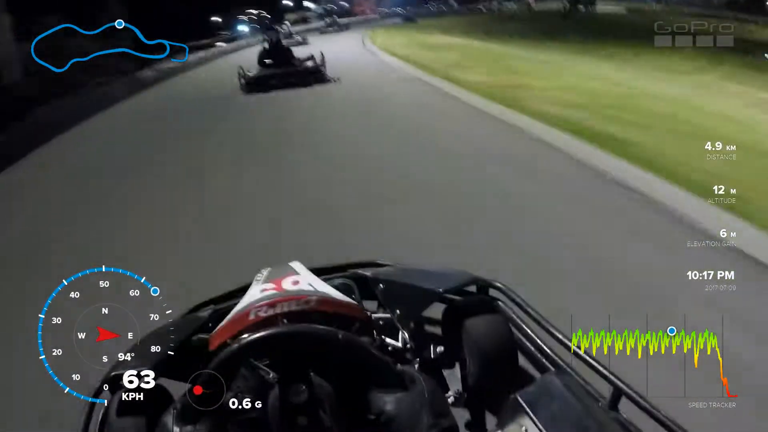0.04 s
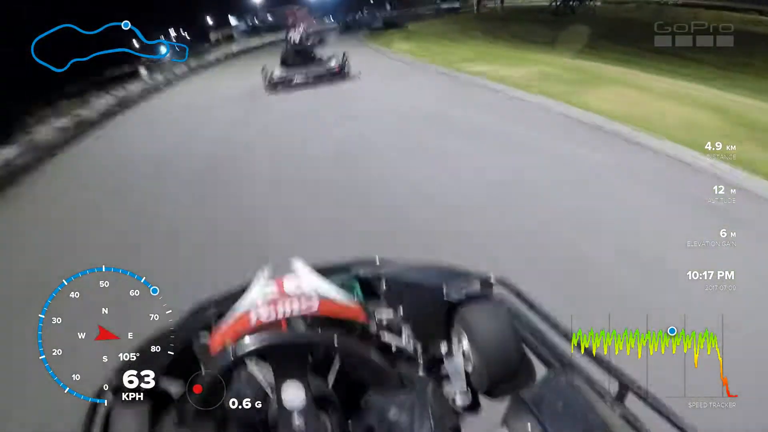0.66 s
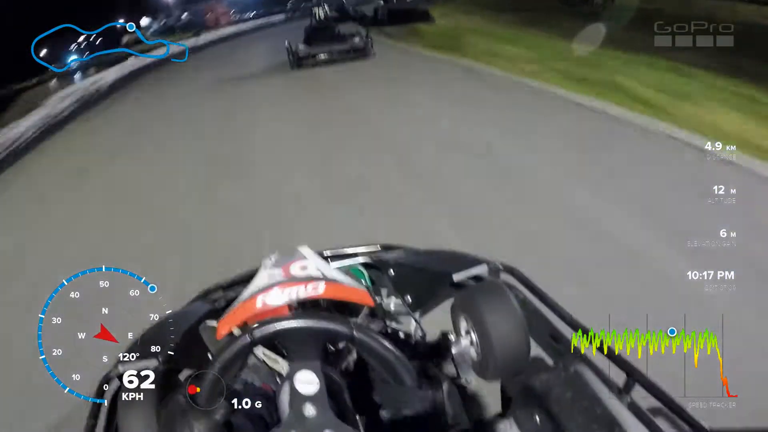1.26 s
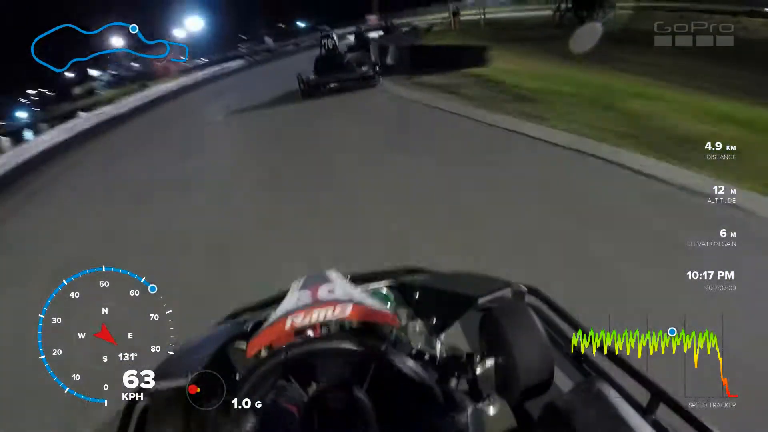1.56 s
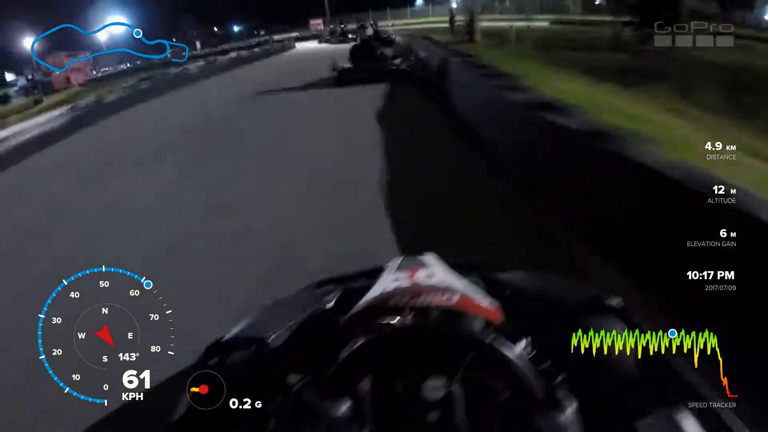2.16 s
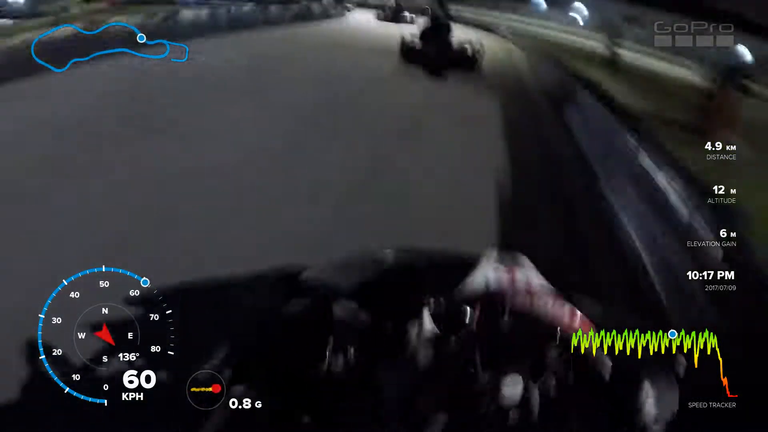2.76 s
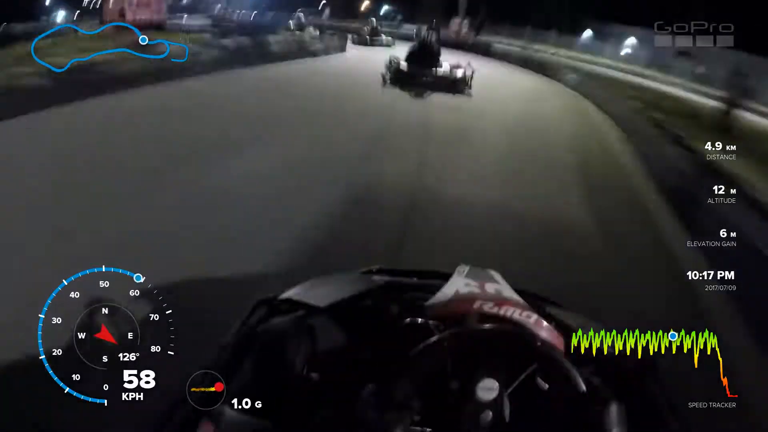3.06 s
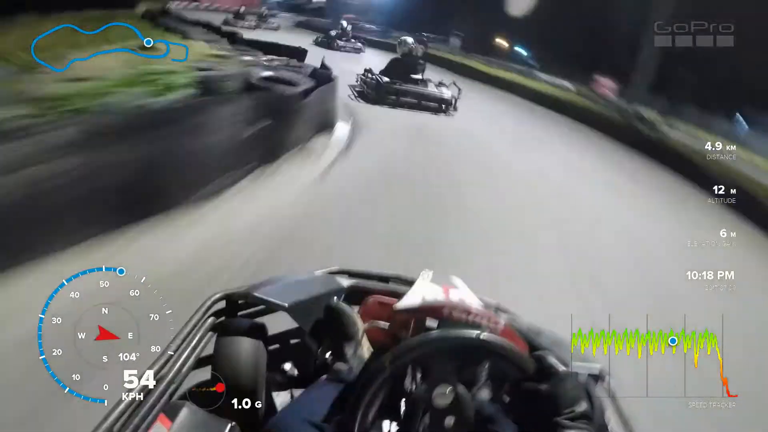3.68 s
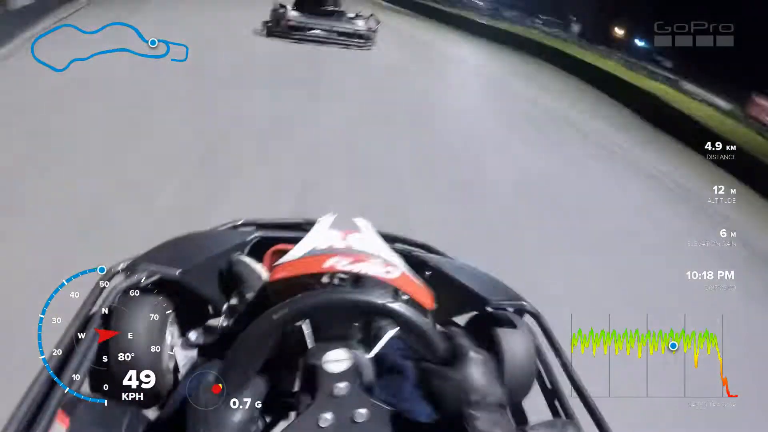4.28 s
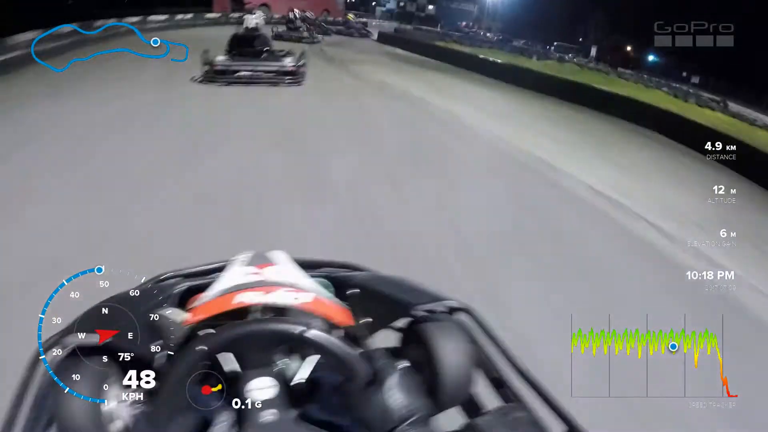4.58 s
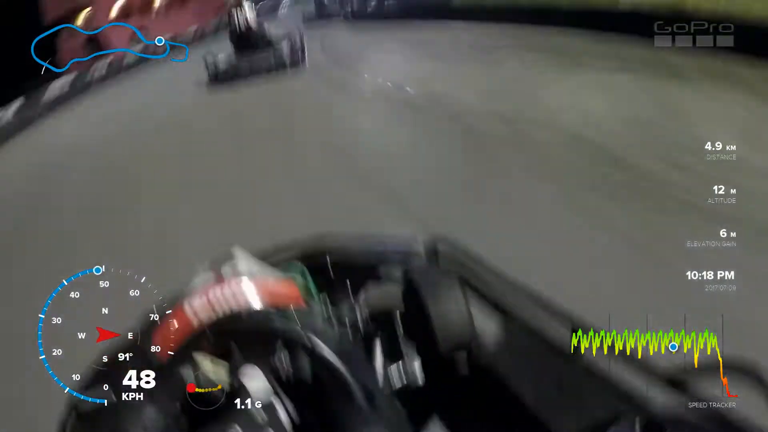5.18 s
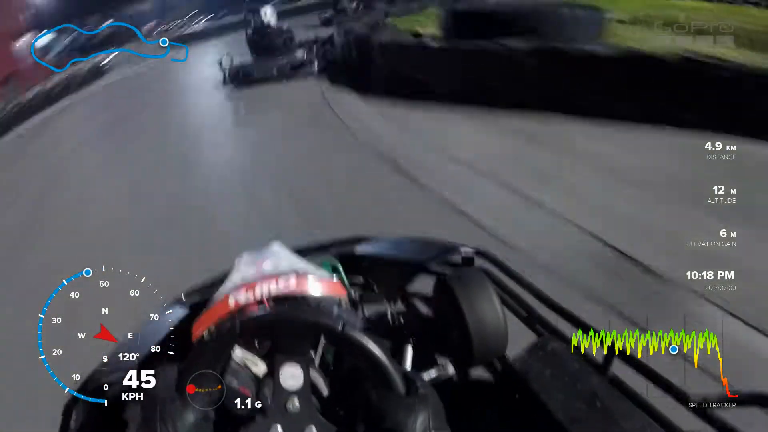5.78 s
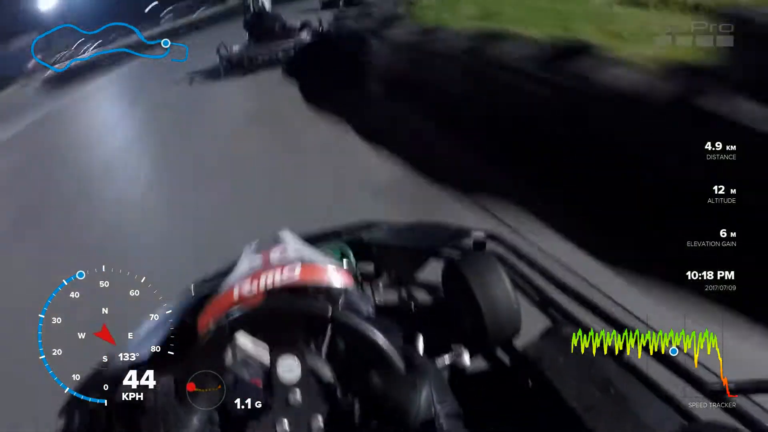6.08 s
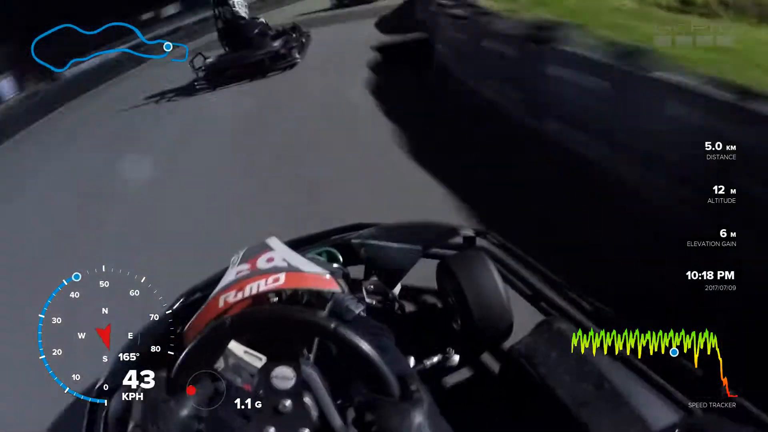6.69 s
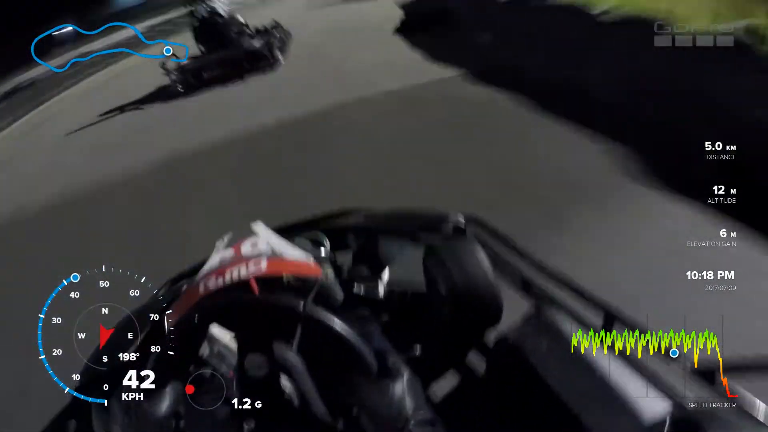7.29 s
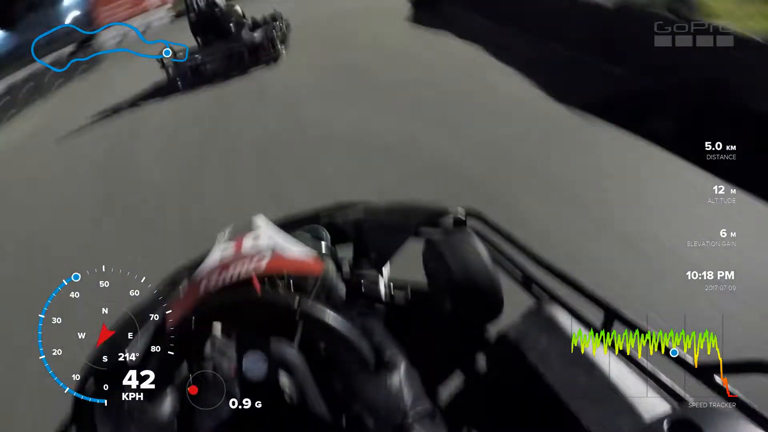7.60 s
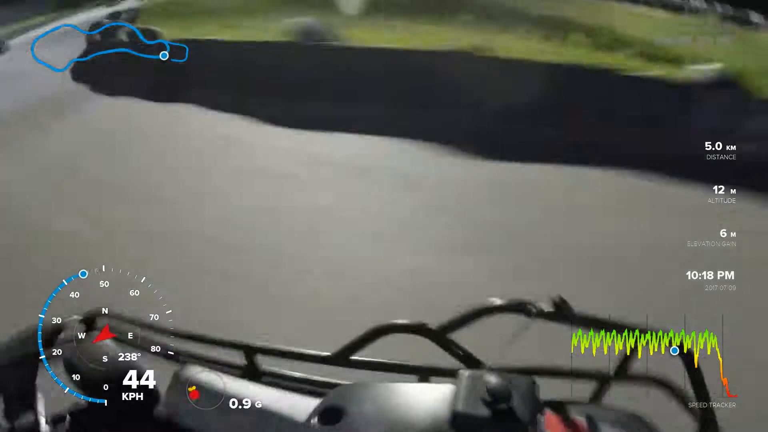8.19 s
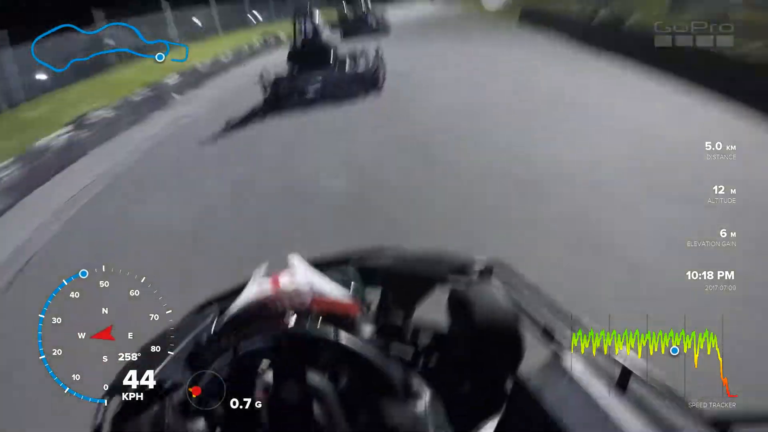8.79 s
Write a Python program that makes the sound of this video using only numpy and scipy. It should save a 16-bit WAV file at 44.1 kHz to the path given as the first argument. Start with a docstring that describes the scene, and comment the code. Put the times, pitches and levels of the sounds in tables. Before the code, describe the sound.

Wind rushes over a helmet microphone as a small four-stroke kart engine buzzes close by at racing speed. The frame clatters over bumps, and the tyres judder and give short squeaks on the asphalt. After a brief rub of the brake, the engine note keeps falling while chain and valves rasp. At the end the throttle opens fully and the pitch lifts slightly under a strong gust.

```python
"""The drone of a single-cylinder four-stroke kart at racing speed, heard from the driver's helmet.
Its pitch sinks through a run of corners, then the engine pulls again under load. Exhaust pulses make a
harmonic series, the piston shakes the frame, and chain and valves add impact noise. Tyres roar, judder
and chirp on the asphalt, the frame rattles on bumps and the brake rubs briefly, while the turbulent
airstream buffets the microphone."""
import sys
import numpy as np
from scipy import signal
from scipy.fft import rfft, irfft, next_fast_len
from scipy.io import wavfile
from scipy.ndimage import uniform_filter1d, minimum_filter1d

SR = 44100
rng = np.random.default_rng(int(sys.argv[2]) if len(sys.argv) > 2 else 0)


def dump_mix(stems):
    """Bounce the given channels to the path in sys.argv[1] as a 16-bit WAV at rate SR."""
    frames = np.atleast_2d(stems).T  # one column per channel
    limited = np.clip(frames, -1, 1)  # hard clip at full scale
    pcm = np.round(limited * 32767).astype(np.int16)
    wavfile.write(sys.argv[1], SR, pcm)


N = 390285

# how the engine is driven: time_s, state (0 flat out, 1 eased, 2 pulling from low revs, 3 floored)
THROTTLE = [(0, 0), (2.35, 0), (2.8, 1), (4.05, 1), (4.35, 2), (5.12, 2), (5.2, 1), (5.28, 1), (5.36, 2),
            (8.15, 2), (8.35, 3), (8.85, 3)]


def engine(crank_hz):
    """Phase locking: exhaust, shake, chain and valves all follow one cycle of two crank turns."""
    firing_hz = crank_hz / 2
    cycle = np.cumsum(firing_hz) / SR + .22   # whole numbers fall on the exhaust beats
    return exhaust(cycle, firing_hz) + crank_shake(cycle, crank_hz) + chain(cycle) + valves(cycle, firing_hz)


def exhaust(cycle, firing_hz):
    """Periodic pressure pulses form a harmonic series; a puff of turbulent gas leads each pulse."""
    # exhaust harmonics: firing_multiple, flat_out_db, eased_db, pulling_db, floored_db
    harmonics = [(1, -14, -19, -21, -21), (3, -5, -7, -7, -6), (4, -16, -2, -11.5, -12),
                 (5, -2, -8, -3.5, -7.5), (6, 0, -8, -4.5, -5.5), (7, -7.5, -17, -5.5, -6),
                 (8, -12, -19, -7.5, -9), (9, -15, -20, -10, -11), (10, -14, -19, -18, -21),
                 (11, -12.5, -20, -18, -15), (12, -17, -23, -23, -24), (13, -18, -29, -22, -19),
                 (14, -19, -28, -24, -24), (15, -21, -29, -22, -23), (16, -17, -28, -25, -22)]
    # the silencer booms or cancels as a harmonic sweeps through: centre_hz, width_hz, gain_db
    silencer = [(97, 14, -6), (158, 16, 3), (207, 18, 2), (230, 10, 2.5), (254, 14, -5), (288, 22, 5.5),
                (423, 25, 3)]
    # overall exhaust gain: flat_out_db, eased_db, pulling_db, floored_db
    throttle_db = [-33, -27, -26, -21.5]
    throttle, = in_time(THROTTLE)
    states = np.arange(len(throttle_db))
    pulses = np.zeros(N)
    for order, *levels_db in harmonics:
        level_db = np.interp(throttle, states, levels_db) + .8 * drift(1.8)
        level_db += resonance_db(silencer, order * firing_hz)
        lag_rad = .07 * (order - 5.5) ** 2   # dispersion: the pipe spreads each pulse in time
        pulses -= np.sqrt(2) * from_db(level_db) * np.cos(2 * np.pi * order * cycle - lag_rad)
    # turbulent gas: frequency_hz, level_db
    puff_spectrum = [(110, -2.5), (165, -1.5), (250, -0.5), (350, -13.5), (450, -18), (900, -17.5),
                     (2000, -36.5)]
    valve_open = np.exp((np.cos(2 * np.pi * (cycle + .12)) - 1) / .7)
    puff = from_db(-8.5) * noise(puff_spectrum, valve_open)
    gain = from_db(np.interp(throttle, states, throttle_db))
    return gain * (pulses + puff) * per_cycle(cycle, spread_db=.9)


def crank_shake(cycle, crank_hz):
    """Forced vibration: the unbalanced piston shakes the frame once a turn, hardest at resonance."""
    # resonances of the frame: centre_hz, width_hz, gain_db
    frame_modes = [(56.4, 1.9, 8), (76.4, 1.9, 5)]
    shake = rms_one(-np.cos(4 * np.pi * cycle) * from_db(2.5 * drift(5)))
    return from_db(-31 + resonance_db(frame_modes, crank_hz)) * shake


def chain(cycle):
    """Dense impacts of chain and gears merge into noise, amplitude-modulated by each crank turn."""
    # chain and gear clatter: frequency_hz, level_db
    clatter_spectrum = [(300, -11), (800, -10), (1200, 8.5), (1800, 9), (2400, -1.5), (3150, -1.5),
                        (3750, 6.5), (4900, 0.5), (6150, -4), (7000, -28.5), (8500, -23), (10500, -57)]
    clatter_db, _ = in_time(MECHANICAL_LEVELS)
    load = 1 + .11 * np.cos(4 * np.pi * (cycle - .25))
    grain = from_db(1.5 * drift(170))
    return from_db(clatter_db) * noise(clatter_spectrum, load * grain)


def valves(cycle, firing_hz, decay_s=.0072):
    """Impact excitation: each contact of cam, rocker and valve sets off a decaying metallic rasp."""
    # contacts after the exhaust beat: cycle_fraction, level_db
    contacts = [(.15, 6), (.3, -7), (.62, -3), (.82, 0), (.9, -4)]
    # valve tick: frequency_hz, level_db
    tick_spectrum = [(1500, -1), (2600, -2.5), (3900, 11), (5000, 6.5), (6100, 10.5), (7100, -1.5),
                     (8000, -5.5), (9400, -14), (10400, -33)]
    _, tick_db = in_time(MECHANICAL_LEVELS)
    envelope = np.zeros(N)
    for place, db in contacts:
        age_s = (cycle - place) % 1 / firing_hz
        envelope += from_db(db) * np.exp(-age_s / decay_s) * per_cycle(cycle, spread_db=2)
    grain = from_db(.7 * np.clip(drift(350), -2, 2))
    return from_db(tick_db) * noise(tick_spectrum, envelope * grain)


def wind(speed_db, rough_db):
    """Turbulence: eddies at the microphone make a deep buffeting and a broader rush, rising with speed."""
    # gusts: start_s, end_s, gain_db
    gusts = [(3.3, 4.1, 2.5), (5.35, 6.8, 5.5), (8.25, 9.2, 10)]
    # sheltered stretches: start_s, end_s, gain_db
    lulls = [(2.2, 3.2, -1.5), (4.3, 5.1, -3), (5.1, 8.1, 0)]
    # buffeting and rush: frequency_hz, level_db
    buffet_spectrum = [(12, -14), (22, -4), (35, 0.5), (50, -2), (90, -5), (200, -14.5), (500, -47)]
    rush_spectrum = [(35, -12.5), (65, -6), (105, 0.3), (200, -2), (290, -6.5), (380, -13), (600, -31),
                     (1500, -39)]
    gust_db = stretches(gusts, edge_s=.29)
    lull_db = stretches(lulls, edge_s=.29)
    buffet_db = -29.5 + 3.6 * speed_db + gust_db + 2.5 * drift(2.2)
    rush_db = -22 + .71 * speed_db + .13 * gust_db + .34 * rough_db + lull_db
    buffet = evened(noise(buffet_spectrum), span_s=.089)
    rush = evened(noise(rush_spectrum), span_s=.23)
    return from_db(buffet_db) * buffet + from_db(rush_db) * rush


def tyres(roar_db, rough_db, judder_hz=15):
    """Amplitude modulation: the unsprung chassis hops on its tyres, so roar and scrub come in surges."""
    # sideways scrub, following the cornering load: time_s, level_db
    cornering = [(0, -37.5), (1.2, -49), (2.0, -30), (2.44, -35), (2.7, -32), (3.05, -35.5), (3.4, -39.5),
                 (4.2, -31.5), (4.75, -41.5), (5.35, -35), (6.5, -36), (7.6, -40.5), (8.15, -35.5),
                 (8.85, -35.5)]
    # rolling roar and sideways scrub: frequency_hz, level_db
    roar_spectrum = [(150, -11.5), (300, 3.5), (430, 5), (800, 1), (1150, -1.5), (1500, -7.5), (2050, -9.5),
                     (2700, -14), (4000, -23), (6000, -22), (7200, -48.5), (10000, -88.5)]
    scrub_spectrum = [(700, -10.5), (1050, -7.5), (1230, -2), (1450, 0.5), (1650, 0), (2000, -5),
                      (2500, -16), (3400, -11.5), (4500, -30.5), (7000, -70.5)]
    cornering_db, = in_time(cornering)
    hop = np.sin(2 * np.pi * np.cumsum(judder_hz * (1 + .29 * drift(6.02))) / SR)
    grip = .41 * hop + .44 * drift(35)
    asphalt = from_db(.75 * drift(150))
    roar = noise(roar_spectrum, asphalt * from_db(2 * grip))
    scrub = noise(scrub_spectrum, asphalt * from_db(grip))
    return from_db(roar_db) * roar + from_db(cornering_db + .29 * rough_db) * scrub


def tyre_chirps(edge_s=.013, pitch_jitter=.07):
    """Stick-slip friction: the tread gives short, unsteady squeals with a rasp around them."""
    # slips of the tread: start_s, level_db, pitch_hz, length_s
    slips = [(1.808, -29, 1480, 0.019), (1.914, -33, 1505, .055), (2.311, -26.5, 1410, 0.022),
             (2.492, -29.5, 1460, 0.08), (2.512, -30, 1750, 0.025), (2.58, -28.5, 1442, 0.075),
             (2.772, -32, 1500, 0.028), (2.906, -29, 1440, .024), (2.941, -34, 1430, 0.089),
             (3.072, -29, 1450, 0.039), (3.116, -29.5, 1420, 0.037), (3.266, -31, 1440, 0.046),
             (3.41, -30.5, 1510, 0.022), (3.944, -41, 1480, 0.06), (4.18, -33, 1440, 0.069),
             (4.42, -35, 1550, 0.043), (8.61, -29, 1480, 0.076)]
    # rasp of the slipping tread: frequency_hz, level_db
    rasp_spectrum = [(1100, -4.5), (1350, -0.5), (1470, -5), (1620, -8), (1900, -5.5), (2400, -21.5),
                     (3000, -15), (3600, -46)]
    t = np.arange(N) / SR
    warped_s = np.cumsum(1 + pitch_jitter * drift(111.1)) / SR
    flutter = evened(from_db(6.5 * drift(90)), span_s=.02)
    rasp = from_db(-3.5) * noise(rasp_spectrum)
    out = np.zeros(N)
    for start, db, hz, length in slips:
        at = slice(int((start - edge_s) * SR), int((start + length + edge_s) * SR))
        squeal = flutter[at] * np.sin(2 * np.pi * hz * warped_s[at])
        out[at] += from_db(db) * gate(t[at], start, start + length, edge_s) * (squeal + rasp[at])
    return out


def seam_thuds(mode_spread_db=2.5):
    """Impulse response: each seam strikes the damped chassis modes and leaves a rumble in the tyre."""
    # seams in the asphalt: start_s, level_db, decay_s
    seams = [(1.876, -29, .014), (1.977, -22, .018), (2.047, -15.5, 0.031), (2.238, -20.5, 0.015),
             (2.353, -24.5, 0.013), (2.607, -22.5, 0.0088), (2.908, -32, .007), (3.214, -23, .006),
             (3.461, -24.5, .008), (3.61, -24, 0.0068), (4.079, -23, .022), (4.128, -25, 0.0062),
             (4.252, -29, .01), (4.31, -20, .012), (4.368, -26, 0.011), (4.447, -33, 0.0058),
             (4.493, -25, 0.0058), (4.573, -27, .006), (5.072, -22.5, 0.012), (5.565, -20.5, 0.0031),
             (5.613, -20, .004), (5.645, -20, 0.0071), (8.668, -26, 0.0065), (8.721, -18, .02),
             (8.822, -29, .01)]
    # chassis modes: pitch_hz, level_db, t60_s
    modes = [(380, 1, .02), (554, 2, 0.011), (770, -4, 0.013), (1070, -12, 0.011)]
    # tyre rumble: frequency_hz, level_db
    rumble_spectrum = [(150, -7), (300, 0.5), (550, 8.5), (850, 5), (1150, -4), (1500, -7), (2700, -14),
                       (5500, -14.5), (7200, -54)]
    t = np.arange(SR // 10) / SR
    knocks = np.zeros(N + len(t))
    for start, db, _ in seams:
        at = int(start * SR)
        for hz, mode_db, t60 in modes:
            strike_db = db + mode_db + mode_spread_db * rng.standard_normal()
            knocks[at:at + len(t)] += from_db(strike_db - 60 * t / t60) * np.sin(2 * np.pi * hz * t)
    envelope = sum(bursts([(start, db)], rise_s=.0018, decay_s=decay) for start, db, decay in seams)
    rumble = envelope * evened(noise(rumble_spectrum), span_s=.018)
    return from_db(1.5) * knocks[:N] + from_db(-1.2) * rumble


def frame_rattle(speed, roar_db, top_jolts_per_s=7):
    """Contact noise: big bumps and a Poisson train of small jolts set the frame clattering."""
    # big bumps: start_s, level_db, length_s
    bumps = [(.002, -23, 0.022), (.024, -24.5, 0.034), (.109, -25.5, 0.023), (.152, -22, .03),
             (.324, -23, 0.015), (.356, -22.5, 0.013), (.407, -22, 0.0092), (.432, -27, .008),
             (.46, -22, 0.0084), (.561, -23, 0.019), (.613, -21, 0.015), (.94, -27, 0.0092),
             (1.092, -24, .012), (1.135, -27, 0.009), (1.151, -24, 0.0093), (1.243, -22, 0.011),
             (1.296, -22, 0.039), (1.345, -25, .012), (1.579, -21, 0.025), (1.689, -25, .01),
             (1.728, -22, 0.031), (1.806, -25, 0.022), (1.966, -22, .018), (1.991, -19, 0.019),
             (2.018, -25, 0.0073), (2.038, -19, .034), (2.08, -28, 0.048), (2.119, -26, 0.026),
             (2.168, -24, 0.0074), (2.235, -21, 0.027), (2.353, -30, .012), (2.404, -22.5, 0.01),
             (2.85, -25, 0.014), (2.993, -26, .009), (3.096, -24.5, .012), (3.189, -23, 0.011),
             (3.347, -32, 0.0097), (3.556, -25, 0.01), (3.654, -25.5, .012), (3.728, -30, .016),
             (3.845, -24, .012), (3.97, -28, 0.011), (4.074, -23, .013), (4.122, -24, .011),
             (4.137, -25, 0.009), (4.238, -22, 0.027), (4.556, -26, 0.015), (5.628, -27, 0.017),
             (8.61, -26, 0.019), (8.672, -34, .01), (8.705, -26, .045)]
    # rattling frame: frequency_hz, level_db
    rattle_spectrum = [(250, 7), (600, 6), (1300, 8), (2200, 1), (3600, -6.5), (4500, -11), (6200, -16.5),
                       (7200, -51), (10000, -68.5)]
    at = np.flatnonzero(rng.random(N) < top_jolts_per_s * speed / SR)
    jolt_db = roar_db - 8 + 3 * rng.uniform(-1.1, 1, N)
    envelope = bursts(zip(at / SR, jolt_db[at]), rise_s=.01, decay_s=.026)
    for start, db, length in bumps:
        first = int(start * SR)
        progress = np.linspace(0, 1, int(length * SR))
        arch = np.abs(np.sin(np.pi * progress ** .85)) ** .55   # builds up and stops short
        envelope[first:first + len(arch)] += from_db(db) * arch
    grain = from_db(drift(500))
    return envelope * evened(noise(rattle_spectrum, grain), span_s=.012)


def brake():
    """Friction excitation: the pad hisses, and the disc sings in snatches as the pad catches and lets go."""
    # the brake drags into the corner: time_s, rub_db, sing_db
    braking = [(0, -76, -70), (2.45, -56, -75.5), (2.68, -41.5, -45), (2.82, -43, -37), (3.05, -60, -40),
               (3.5, -50, -33), (3.8, -73, -47), (4.2, -74, -80)]
    # pad hiss and disc resonance: frequency_hz, level_db
    pad_spectrum = [(2400, -15.5), (3100, 1.5), (3700, 0), (4400, -27)]
    disc_spectrum = [(850, -31), (940, -8), (1005, 4.5), (1060, -9), (1150, -30.5)]
    rub_db, sing_db = in_time(braking)
    rub = from_db(rub_db) * noise(pad_spectrum)
    catching = np.clip(.5 + drift(30), 0, 1)
    return rub + from_db(sing_db) * catching * evened(noise(disc_spectrum), span_s=.024)


def grit():
    """Light impacts: grit strikes the bodywork in short, bright ticks."""
    # grit strikes: start_s, level_db
    strikes = [(2.399, -40), (2.855, -35), (2.975, -34.5), (7.205, -37), (8.212, -45)]
    # ring of the bodywork: frequency_hz, level_db
    ring_spectrum = [(1500, -8), (3500, 2), (6000, 2), (7200, -10.5), (9500, -27), (10500, -35)]
    return bursts(strikes, rise_s=.0061, decay_s=.0095) * noise(ring_spectrum)


def from_db(db):
    """Decibels to amplitude ratio."""
    return 10 ** (np.asarray(db) / 20)


def rms_one(x):
    """Normalisation to unit rms."""
    return x / np.sqrt(np.mean(x ** 2) + 1e-20)


def evened(x, span_s):
    """Normalisation by a running rms holds a signal at unit strength."""
    return x / np.sqrt(uniform_filter1d(x ** 2, int(span_s * SR)) + 1e-9)


def in_time(rows):
    """Linear interpolation of each column of a curve, one value a sample."""
    times_s, *columns = np.transpose(rows)
    return [np.interp(np.arange(N) / SR, times_s, column) for column in columns]


def noise(spectrum, envelope=1):
    """Source and filter: white noise under an envelope, shaped by a spectrum and set to unit rms."""
    size = next_fast_len(N + SR // 10)
    hz = np.arange(size // 2 + 1) * SR / size
    octave = np.log2(np.maximum(hz, 1))
    points_hz, levels_db = np.transpose(spectrum)
    points = np.log2(points_hz)
    octaves_outside = np.abs(octave - np.clip(octave, points[0], points[-1]))
    gain = from_db(np.interp(octave, points, levels_db) - 20 * octaves_outside)
    source = envelope * rng.standard_normal(N)
    return rms_one(irfft(rfft(source, size) * gain, size)[:N])


def drift(rate_hz):
    """Low-pass filtered noise: a random wander of unit rms."""
    step, settle = 40, 2000   # samples per step; steps for the filter to settle
    pole = np.exp(-2 * np.pi * step * rate_hz / SR)
    white = rng.standard_normal(N // step + settle + 2)
    slow = signal.lfilter([1], [1, -2 * pole, pole * pole], white)[settle:]
    return np.interp(np.arange(N) / step, np.arange(len(slow)), rms_one(slow))


def per_cycle(cycle, spread_db):
    """Cycle-to-cycle variation: a new random strength, changing between the beats."""
    strength = from_db(spread_db * np.clip(rng.standard_normal(int(cycle[-1]) + 2), -2, 2))
    return uniform_filter1d(strength[np.round(cycle).astype(int)], SR // 200)


def resonance_db(modes, at_hz):
    """Lorentzian peaks and dips raise or lower a tone near their centres."""
    return sum(db / (1 + (2 * (at_hz - hz) / width) ** 2) for hz, width, db in modes)


def bursts(events, rise_s, decay_s):
    """Envelope of short blows with exponential rise and decay."""
    out, t = np.zeros(N), np.arange(SR // 2) / SR
    shape = (1 - np.exp(-t / rise_s)) * np.exp(-t / decay_s)
    for start, db in events:
        at = int(start * SR)
        out[at:at + len(t)] += from_db(db) * shape[:N - at] / shape.max()
    return out


def gate(t, start_s, end_s, edge_s):
    """A trapezoidal window."""
    return np.clip(np.minimum(t - start_s, end_s - t) / edge_s + .5, 0, 1)


def stretches(rows, edge_s):
    """Gains in dB, each held over its stretch, add where they overlap."""
    t = np.arange(N) / SR
    return sum(db * gate(t, start, end, edge_s) for start, end, db in rows)


def scene():
    """Superposition of sources that travel with the listener; one speed drives engine, roar and wind."""
    # the crankshaft, geared straight to the wheels: time_s, rotation_hz
    crank = [(0.0, 77.7), (1.0, 77.6), (1.8, 77.7), (2.8, 75.45), (3.0, 73.15), (3.4, 71.9), (4.0, 65.75),
             (4.5, 63.9), (4.8, 61.95), (5.4, 60.05), (5.7, 59.5), (6.2, 58.3), (6.6, 56.8), (7.3, 55.85),
             (7.8, 54.6), (8.25, 53.95), (8.85, 55.15)]
    # rougher or smoother asphalt: start_s, end_s, gain_db
    patches = [(-.2, .9, 3.5), (.9, 1.53, 4.5), (1.55, 1.95, 5.5), (2.22, 2.2, 2.5), (2.42, 2.72, -5.5),
               (2.74, 2.9, -3.5), (2.86, 4.1, -1.5), (3.55, 5.1, 3.5), (4.07, 4.17, 2.5), (4.25, 4.34, 4.5),
               (4.42, 4.26, 2), (5.32, 5.7, 1), (7.65, 7.98, 1.5), (8.1, 8.3, -1), (8.56, 9.2, 2),
               (8.66, 8.9, 6.5), (8.77, 8.94, 1)]
    crank_hz, = in_time(crank)
    speed = crank_hz / 77.5   # 1 at top speed
    speed_db = 20 * np.log10(speed)
    rough_db = stretches(patches, edge_s=.023)
    roar_db = -29.5 + .49 * speed_db + rough_db
    mix = engine(crank_hz) + tyres(roar_db, rough_db) + tyre_chirps() + seam_thuds()
    mix += brake() + frame_rattle(speed, roar_db) + grit() + wind(speed_db, rough_db)
    return mix[None]


def limiter(x, ceiling_db, hold_s):
    """Peak limiting: the gain ducks around each peak that would pass the ceiling."""
    size = int(hold_s * SR)
    allowed = np.minimum(1, from_db(ceiling_db) / (np.abs(x) + 1e-9))
    return x * uniform_filter1d(minimum_filter1d(allowed, size), size)


def record(dry):
    """Peak limiting, then a steep low-pass filter that cuts the top treble."""
    held = limiter(dry, ceiling_db=-9.5, hold_s=.015)
    cutoff_hz = 10400
    return signal.sosfilt(signal.ellip(10, .1, 90, cutoff_hz, fs=SR, output="sos"), held)


# mechanical noise of the engine: time_s, chain_db, valve_db
MECHANICAL_LEVELS = [(0, -37.5, -55.5), (2.05, -39, -56.5), (2.38, -39.5, -47), (2.7, -42, -57.5),
                     (3.9, -40.5, -46), (4.3, -35.5, -55.5), (4.95, -43, -52), (5.5, -40, -45.5),
                     (6.15, -39, -46), (6.6, -35.5, -40.5), (7.75, -34, -42.5), (8.15, -45, -44),
                     (8.49, -40, -38.5), (8.68, -31.5, -43), (8.85, -38, -48)]

dry = scene()
out = record(dry)
dump_mix(out)
```